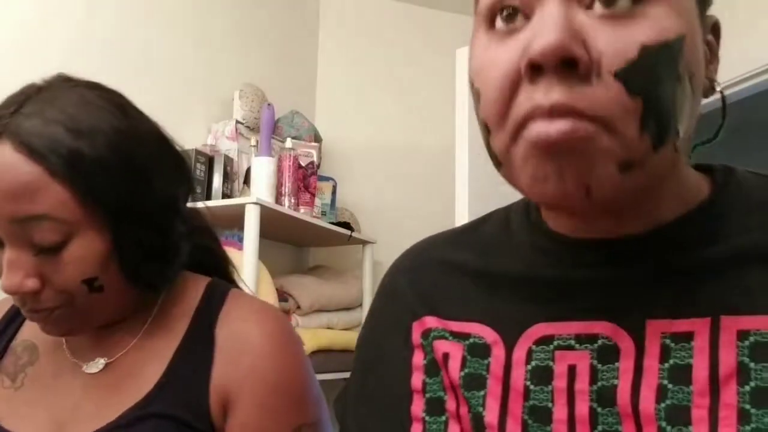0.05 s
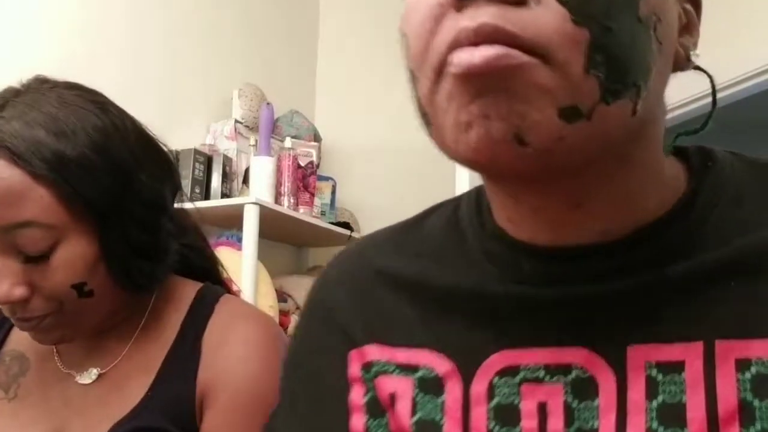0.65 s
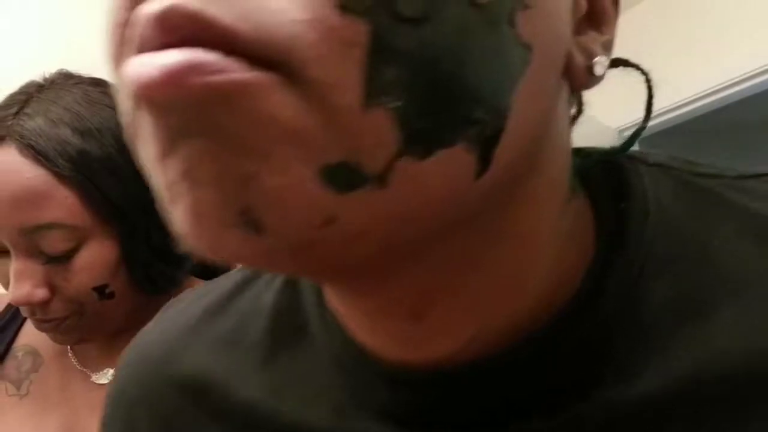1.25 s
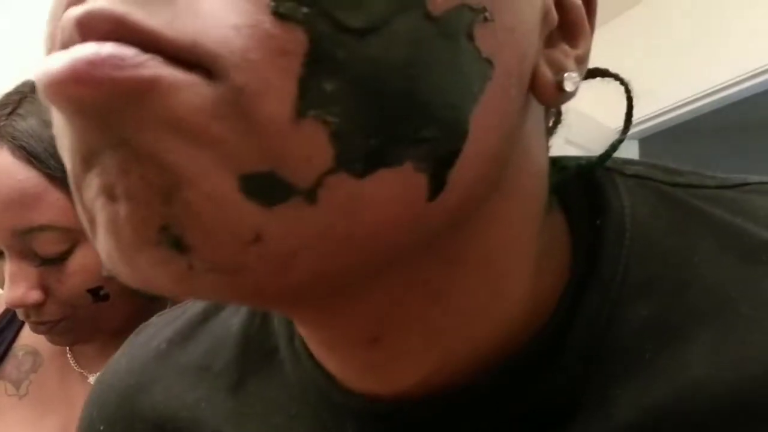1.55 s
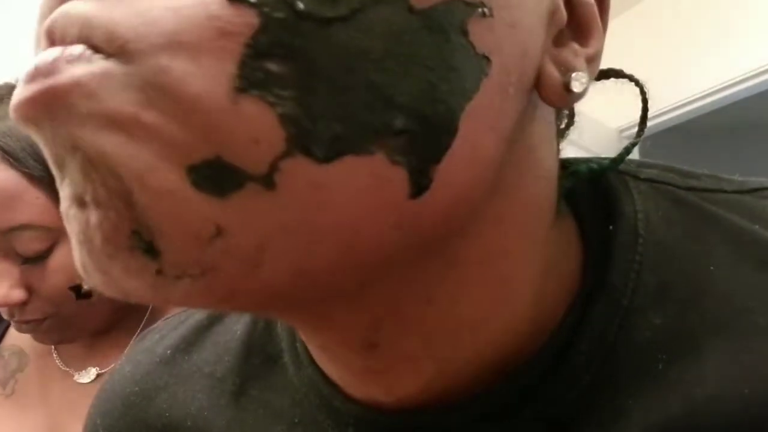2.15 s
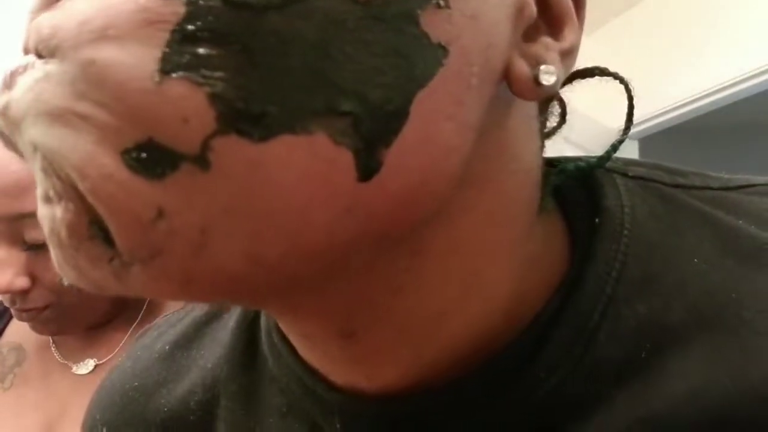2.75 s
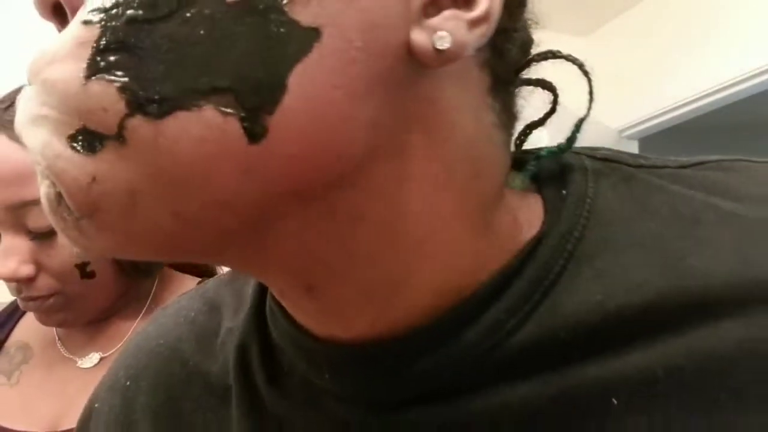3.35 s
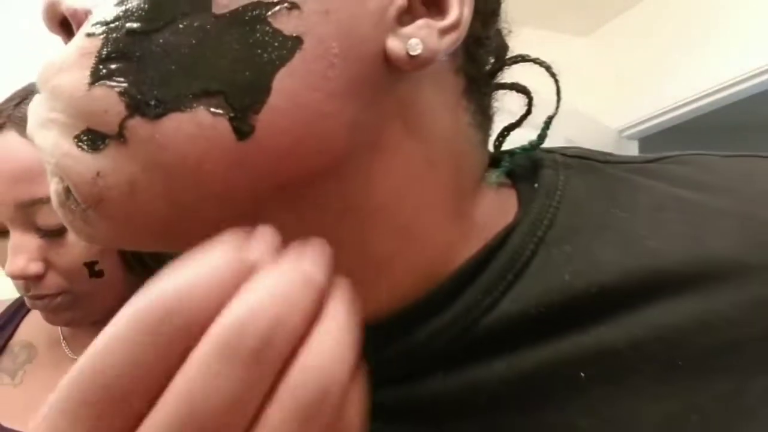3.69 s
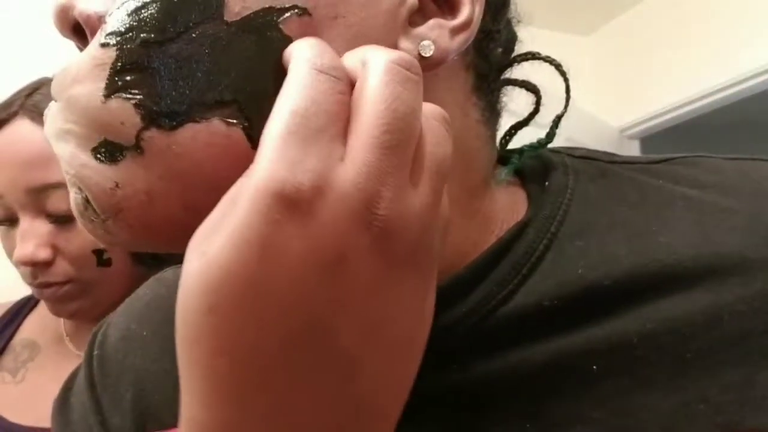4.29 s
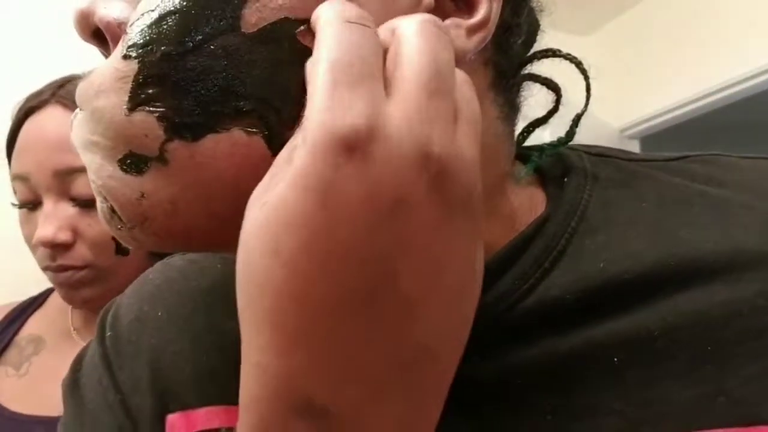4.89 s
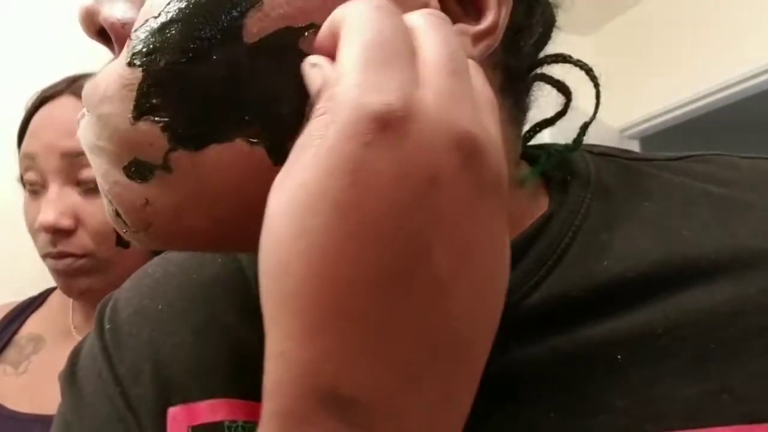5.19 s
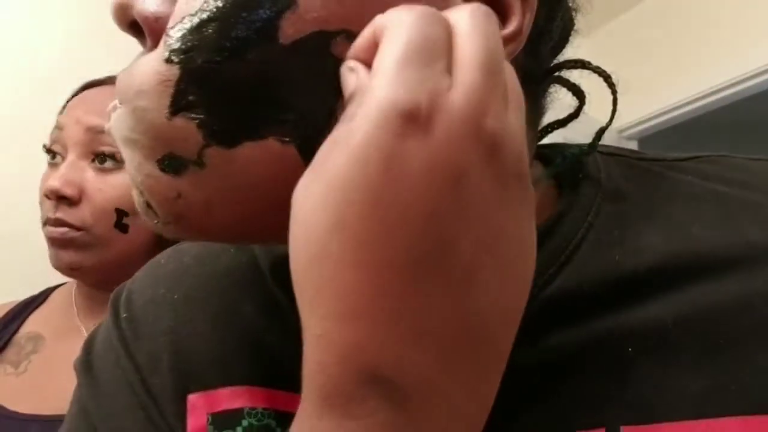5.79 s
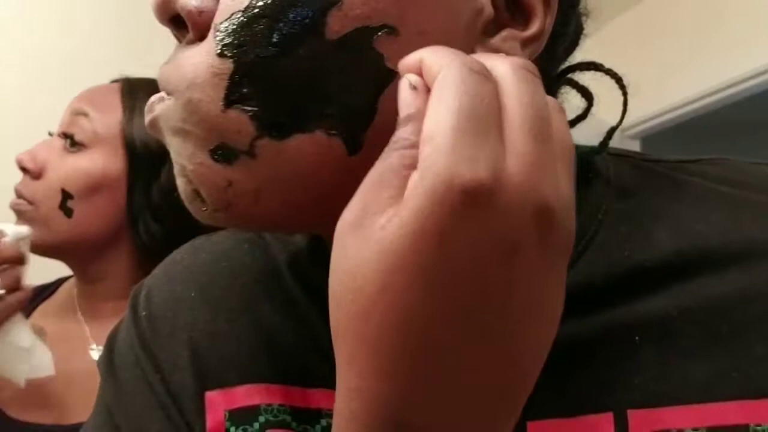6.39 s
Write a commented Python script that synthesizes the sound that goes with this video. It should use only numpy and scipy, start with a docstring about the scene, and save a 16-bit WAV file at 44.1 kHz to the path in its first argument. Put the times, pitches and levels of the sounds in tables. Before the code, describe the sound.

Close, sticky crackles and sharp little snaps come in short pulls as a face mask is peeled from a cheek.

```python
"""Peeling off a dried face mask

Close to a hand-held phone in a small room, the film lets go in sharp snaps: runs of tiny ruptures
that ring the film and jolt the skin. Each pull rubs, crinkles and tears at the glue, and once the
tacky film sticks and slips in a squeak. Two dull bumps and, near the end, a light tap join in.
Behind it all lie a low mains hum and the quiet rush of the room."""
import sys
import numpy as np
from scipy import signal
from scipy.fft import rfft, irfft, next_fast_len
from scipy.io import wavfile
from scipy.ndimage import map_coordinates

SR = 44100
rng = np.random.default_rng(int(sys.argv[2]) if len(sys.argv) > 2 else 0)


def file_out(sig):
    """Save sig as 16-bit WAV at sys.argv[1]."""
    # one column per channel
    cols = np.atleast_2d(sig).T
    # limit, then scale
    lim = np.clip(cols, -1, 1)
    pcm = np.round(lim * 32767).astype(np.int16)
    wavfile.write(sys.argv[1], SR, pcm)


N = 283857
TIME = np.arange(N) / SR

# dull thud of the skin: freq_hz, density_db
SKIN_SPECTRUM = [(30, -21), (90, -9.5), (140, -1), (175, -5.5), (215, 3), (275, -7), (335, 1), (420, -0.5),
                 (540, -3), (660, -8), (705, -2), (750, -5.5), (950, -15), (2000, -61.5)]
# midrange resonances of the dried film: freq_hz, density_db
FILM_SPECTRUM = [(250, -30.5), (700, -14), (880, -6.5), (1080, 1.5), (1230, -6.5), (1420, -2), (1780, -1.5),
                 (2150, -5.5), (2600, -6), (3100, -8), (4200, -16.5), (9000, -41.5)]
# hiss of tearing glue: freq_hz, density_db
GLUE_SPECTRUM = [(1200, -27), (2600, -3), (3800, -1.5), (5600, -2), (7700, 1.5), (9800, -3.5),
                 (14500, -4.5)]


def snaps(usual_db=-41.5, skin_give_s=.006):
    """Each snap is a quick run of tiny ruptures that rings the film and jolts the skin."""
    # breaks of the film, crispness and thud relative to level:
    # start_s, level_db, crispness_db, thud_db, tear_s
    breaks = [(0.4455,-52.5,-2,-15,0.0023), (0.4725,-46.5,-6,-7.5,0.0023), (0.5642,-37.5,-0.5,-15.5,.008),
              (.637,-38,-7.5,-9.5,0.0034), (0.7026,-41.5,8.5,-8.5,.002), (0.7206,-41.5,-7,-3.5,0.0018),
              (0.768,-38.5,-20,-8,0.0034), (0.7732,-37,0.5,-8,.004), (0.8221,-39.5,-2.5,-3.5,0.0022),
              (.867,-42.5,-25,-2,0.0023), (0.9317,-42,-5.5,-5,.0015), (.938,-31.5,-6,-9,0.0057),
              (1.0347,-28.5,-8,-2,0.0033), (1.0518,-35,1,-1.5,0.0049), (1.218,-50,-3,-14,0.0062),
              (1.2251,-36,-10.5,-5,0.0091), (1.2827,-48.5,1,6.5,.0026), (1.29,-36.5,-7,-6,0.0073),
              (1.3376,-46,-6.5,-18,.003), (1.5047,-50,-6,-5.5,0.0042), (1.608,-56,-5,-16,0.03),
              (1.7056,-54,-18,-12,.018), (1.8975,-54,-10,-3.5,.011), (1.9378,-44.5,-15,-14.5,0.0017),
              (2.027,-43,-3.5,-15,0.0061), (2.0733,-48,3.5,-19,.0012), (2.144,-57.5,-13,-13,.001),
              (2.2135,-45.5,-35,-14,0.0017), (2.422,-43.5,-11.5,-11.5,0.0026),
              (2.976,-49,-22.5,-1.5,0.0095), (3.033,-58,-29,-12,0.00085), (3.1028,-38.5,-14.5,-6.5,0.0031),
              (3.2282,-49.5,-17.5,-10.5,0.0034), (3.283,-49,-28,-6.5,0.0021), (3.38,-41.5,-2,-6.5,0.004),
              (3.481,-44,-10.5,-7,.008), (3.632,-43.5,-4,-7.5,0.0046), (3.676,-51.5,-8.5,-2,0.0059),
              (3.7794,-46,-12,-10.5,0.0043), (3.835,-41,-10.5,-7.5,0.0072), (3.943,-34.5,-6.5,-6.5,.003),
              (4.01,-42,-13.5,-6,.002), (4.1068,-47.5,-9,-14.5,0.0056)]
    # bright edge of a break: freq_hz, density_db
    crack_spectrum = [(900, -21), (2400, -0.5), (3700, 3), (5900, -2), (7700, 1.5), (9600, -8),
                      (14500, -10)]
    out = np.zeros((2, N))
    thud = voice(SKIN_SPECTRUM)
    for start_s, level_db, crispness_db, thud_db, tear_s in breaks:
        force_db = level_db - usual_db
        pan_db = -9.5 + .29 * force_db  # strong snaps lie nearer the middle
        # a crisp break reaches higher than a soft one
        bright_db = np.clip(crispness_db + 7, -16, 2)
        tilt_db_per_octave = .75 * max(bright_db, -10)
        crack = voice(coloured(crack_spectrum, lambda hz: tilt_db_per_octave * np.log2(hz / 4000)))
        # the crisper and stronger the break, the higher its flap rings
        flap = flap_spectrum(1900 * 2 ** (.016 * (crispness_db + force_db)), focus_db=7)
        body = voice(coloured(flap, lambda hz: .5 * bright_db * np.clip((hz - 1800) / 700, 0, 1)))
        ruptures = rupture_run(tear_s, first_break=1.41)
        jolt = rupture_run(tear_s + skin_give_s, first_break=.72)  # soft skin spreads the jolt
        wet_path = room_path(near_db=1.5, near_t60_s=.059, room_db=-2.5)
        dry_path = room_path(near_db=-1, near_t60_s=.043, room_db=-3.5)
        # the treble arrives driest; the head shades the far microphone, least in the bass
        layers = ((jolt, thud, wet_path, thud_db, .25),
                  (ruptures, body, wet_path, .3, .8),
                  (ruptures, crack, dry_path, crispness_db + .4, .6))
        for drive, ring, path, layer_db, shade in layers:
            add(out, start_s, amp(level_db + layer_db) * pan(shade * pan_db) * excite(drive, ring, path))
    return out


def rupture_run(length_s, first_break, size=2048):
    """A quick, dying run of tiny ruptures."""
    t = np.arange(size) / SR
    ruptures = rng.standard_normal(size) ** 3 * (rng.random(size) < .12)
    ruptures *= np.exp(-2 * t / length_s)
    ruptures /= np.linalg.norm(ruptures) + 1e-9
    ruptures[0] += first_break * np.exp(-length_s / .016)  # a shorter tear starts harder
    return ruptures[None]


def flap_spectrum(pitch_hz, focus_db):
    """A loose flap favours the film's resonances near its own pitch."""
    return coloured(FILM_SPECTRUM, lambda hz: -focus_db * min(np.log2(hz / pitch_hz) ** 2, 2))


def peeling():
    """Dull rubbing, crinkling of the film and fine tearing of the glue follow each pull."""
    # pulls on the film, rub and tear relative to effort: start_s, length_s, effort_db, rub_db, tear_db
    pulls = [(0.343,.08,-60.5,1.5,-5.5), (.43,0.12,-57.5,-4.5,-0.5), (0.566,.12,-50,-8,-9),
             (0.699,.13,-46.5,-4.5,-9), (0.851,.18,-37.5,-3.5,-13), (1.04,0.17,-54.5,0.5,-6.5),
             (1.2,0.13,-52,-1.5,-13), (1.382,.2,-62.5,-1,-8.5), (1.588,0.14,-57.5,-8,-11),
             (1.878,0.067,-59,-5.5,-6), (1.94,0.096,-53,-14,-3), (2.108,.15,-65.5,0.5,-3),
             (2.268,0.23,-64,1,-12.5), (2.762,0.4,-64,-2.5,-7), (3.102,0.044,-50,-8,-8),
             (3.18,0.183,-61,-0.5,-4), (3.418,.11,-51.5,2,-6), (3.586,.13,-53.5,-1.5,-3),
             (3.769,0.15,-46,-8,-6), (3.978,.15,-61.5,-2.5,-3), (4.203,0.059,-58,1.5,-6.5)]
    efforts = np.zeros((3, N))
    for start_s, length_s, effort_db, rub_db, tear_db in pulls:
        peaks = amp(effort_db) * amp([[rub_db], [0], [tear_db]])
        efforts = np.maximum(efforts, peaks * pull(start_s, length_s))
    rubbing, crinkling, tearing = efforts
    flap = flap_spectrum(1600, focus_db=5)
    rub = crackle(amp(1) * rubbing, SKIN_SPECTRUM, per_s=900, spread_db=2.5, clump_db=.5, pan_db=-3)
    crinkle = crackle(amp(-4) * crinkling, flap, per_s=1100, spread_db=3.5, clump_db=3, pan_db=-6)
    tear = crackle(amp(-1) * tearing, GLUE_SPECTRUM, per_s=3000, spread_db=1.5, clump_db=3, pan_db=-5.5)
    return rub + crinkle + tear


def pull(start_s, length_s, grip_s=.027, swell_db=4.5, release_db_per_s=220.5):
    """Envelope of one pull: it takes hold, builds steadily, then lets go."""
    t = TIME - start_s
    grip = np.clip(t / grip_s, 0, 1)
    return grip * amp(np.minimum(swell_db * (t / length_s - 1), release_db_per_s * (length_s - t)))


def crackle(effort, spectrum, per_s, spread_db, clump_db, pan_db, spots=3):
    """Small bonds break at random, in clumps, at a few spots on the cheek."""
    out = np.zeros((2, N))
    strength = effort * amp(clump_db * wobble(45))
    for _ in range(spots):
        sizes = amp(spread_db * np.minimum(rng.standard_exponential(N), 4))
        signs = rng.choice([-1, 1], N)
        grains = unit(sizes * signs * (rng.random(N) < per_s / spots / SR))
        ring = signal.fftconvolve(room_path(), voice(spectrum), axes=1)
        ring /= np.linalg.norm(ring, axis=1, keepdims=True)
        out += signal.fftconvolve((strength * grains)[None], ring, axes=1)[:, :N]
    return out * pan(pan_db) / np.sqrt(spots)


def squeak():
    """Two overlapping chirps of tacky film."""
    # glide of the main chirp: time_s, pitch_hz, level_db
    main_glide = [(2.69, 950, -73), (2.702, 940, -49.5), (2.713, 1100, -53), (2.723, 1052, -52),
                  (2.731, 1066, -65), (2.741, 1115, -69), (2.756, 1060, -82)]
    # its harmonics: multiple, level_db
    harmonics = [(1, -23), (2, 2.5), (3, -7), (4, -16), (5, -17), (6, -14), (7, -11), (8, -22)]
    # the short slip that ends the squeak: time_s, pitch_hz, level_db
    slip_glide = [(2.718, 1136, -75), (2.729, 1190, -55.5), (2.739, 1290, -61), (2.747, 1490, -58.5),
                  (2.757, 1480, -80)]
    chirps = chirp(main_glide, harmonics, jitter=.028, rasp_db=-11)
    chirps += chirp(slip_glide, [(1, 0)], jitter=.0255, rasp_db=-1)
    path = room_path(room_db=-4)
    heard = signal.fftconvolve(chirps[None], path / np.linalg.norm(path[0]), axes=1)
    return heard[:, :N] * pan(-6)


def chirp(glide, harmonics, jitter, rasp_db):
    """The tacky surface sticks and slips at a gliding rate, each slip with a puff of hiss."""
    times_s, *columns = np.transpose(glide)
    pitch_hz, level_db = [np.interp(TIME, times_s, column) for column in columns]
    phase = 2 * np.pi * np.cumsum(pitch_hz * (1 + jitter * wobble(700))) / SR
    slips = sum(amp(db) * np.sin(multiple * phase) for multiple, db in harmonics)
    puffs = rng.standard_normal(N) * (1 + np.cos(phase))
    rasp = filtered(puffs, lambda hz: amp(along(GLUE_SPECTRUM, hz)))
    sounding = (TIME > times_s[0]) & (TIME < times_s[-1])
    return (unit(slips) + amp(rasp_db) * unit(rasp)) * amp(level_db) * sounding


def bumps():
    """A sudden shift of skin or cloth gives a dull thud."""
    # shifts of skin and cloth: start_s, level_db, length_s
    shifts = [(3.49,-41.5,.016), (4.28,-50.5,.017)]
    out = np.zeros((2, N))
    for start_s, level_db, length_s in shifts:
        path = room_path(near_db=1.5, near_t60_s=.06, room_db=-2)
        thud = excite(rupture_run(length_s, first_break=1.6), voice(SKIN_SPECTRUM), path)
        add(out, start_s, amp(level_db) * pan(-2) * thud)
    return out


def tap(start_s=5.1535, level_db=-51.5, rattle_t60_s=.1, size=2048):
    """A light, slightly rattling tap farther off, heard mostly through its reflections."""
    # resonances of the tap: freq_hz, density_db
    tap_spectrum = [(80, -19), (200, -1.5), (330, -0.5), (560, -6), (760, 4), (1050, -11), (1450, 1),
                    (1900, -1), (2450, -0.5), (3200, -15.5), (5500, -17.5), (8000, -29), (14000, -44)]
    contact = rng.standard_normal(size) * amp(-60 * np.arange(size) / SR / rattle_t60_s)
    contact[0] += 7  # the first touch
    knock = signal.fftconvolve(voice(tap_spectrum), contact[None])
    heard = signal.fftconvolve(room_path(near_t60_s=.07, room_db=-1), knock, axes=1)
    attack_rms = np.std(heard[:, :1100])
    out = np.zeros((2, N))
    add(out, start_s, amp(level_db) * pan(-6.5) * heard / attack_rms)
    return out


def room_tone(air_db=-63.5, drift_rad=.62):
    """Soft steady air noise and the slightly unsteady hum of an appliance."""
    # rush of the quiet room: freq_hz, density_db
    air_spectrum = [(12, -43), (20, -15.5), (43, -7), (75, -4.5), (123, -4), (145, -12.5), (232, -16.5),
                    (342, -17), (489, -13.5), (719, -27), (947, -28), (1790, -36.5), (2110, -35.5),
                    (3270, -39.5), (14500, -39.5)]
    # tones of the hum: pitch_hz, level_db
    hum_tones = [(91.5, -84), (119, -71), (495, -80.5)]
    air = unit(filtered(diffuse_noise(N), lambda hz: amp(along(air_spectrum, hz))))
    hum = sum(amp(db) * np.sqrt(2) * np.sin(2 * np.pi * hz * TIME + drift_rad * wobble(5))
              for hz, db in hum_tones)
    return (amp(air_db) * air + hum) * pan(-1.2)


def room_path(near_db=0, near_t60_s=.093, room_db=0, lag_samples=13, size=SR // 3):
    """Stereo impulse response: direct sound, scatter off face and hand, then the room's tail."""
    # ring of the small room: freq_hz, t60_s
    decay_times = [(150, 0.21), (400, 0.35), (1040, 0.28), (2760, 0.23), (7280, 0.22), (14000, .2)]
    t = np.arange(size) / SR
    hz, frames_s, bands = signal.stft(diffuse_noise(size), SR, nperseg=256)
    bands *= amp(-60 * frames_s / along(decay_times, hz)[:, None])
    tail = signal.istft(bands, SR, nperseg=256)[1][:, :size]
    tail *= 1 - np.exp(-t / .0055)  # reflections take a moment to build
    scatter = diffuse_noise(size) * amp(-60 * t / near_t60_s)
    response = amp(near_db) * scatter / np.linalg.norm(scatter[0])
    response += amp(room_db) * tail / np.linalg.norm(tail[0])
    response[1, 0] += 1  # the direct sound reaches the right side first
    response[0, lag_samples] += 1
    return response


def diffuse_noise(n):
    """Noise from all sides: alike at both microphones only in the bass."""
    # likeness of left and right: freq_hz, coherence
    likeness = [(120, 0.91), (250, 0.84), (500, 0.39), (1000, 0.18), (4000, 0.07)]

    def mid_side_gains(hz):
        angle = np.arccos(along(likeness, hz)) / 2
        return np.array([np.cos(angle), np.sin(angle)])

    mid, side = filtered(rng.standard_normal((2, n)), mid_side_gains)
    return np.array([mid + side, mid - side])


def voice(spectrum, size=2048):
    """The minimum-phase ring of a body with this spectrum."""
    cepstrum = irfft(np.log(amp(along(spectrum, np.fft.rfftfreq(size, 1 / SR)))))
    cepstrum[1:size // 2] *= 2
    cepstrum[size // 2 + 1:] = 0
    return irfft(np.exp(rfft(cepstrum)))[None, :size // 2]


def excite(ruptures, ring, path, attack_samples=530):
    """Ruptures through a body and its path to the microphones, with an attack of rms 1."""
    sound = signal.fftconvolve(path, signal.fftconvolve(ring, ruptures), axes=1)
    return sound / np.std(sound[:, :attack_samples], axis=1, keepdims=True)


def coloured(spectrum, extra_db):
    """The spectrum with an EQ curve added."""
    return [(hz, db + extra_db(hz)) for hz, db in spectrum]


def filtered(x, response):
    """Filter x with a gain given as a function of frequency."""
    n = x.shape[-1]
    padded = next_fast_len(n + 4096)
    return irfft(rfft(x, padded) * response(np.fft.rfftfreq(padded, 1 / SR)), padded)[..., :n]


def along(points, hz):
    """Interpolate (freq_hz, value) points on a log frequency axis."""
    freqs_hz, values = np.transpose(points)
    return np.interp(np.log(hz + 1), np.log(freqs_hz + 1), values)


def wobble(knots_per_s):
    """A smooth random curve."""
    return map_coordinates(rng.standard_normal(int(N * knots_per_s / SR) + 4), [TIME * knots_per_s])


def pan(pan_db):
    """Left and right gains of constant power; negative leans right."""
    return unit(amp([[pan_db / 2], [-pan_db / 2]]))


def add(track, start_s, sound):
    """Mix a sound into the track."""
    part = track[:, round(start_s * SR):][:, :sound.shape[1]]
    part += sound[:, :part.shape[1]]


def amp(db):
    """Decibels to gain."""
    return 10 ** (np.asarray(db) / 20)


def unit(x):
    """Scale to rms 1."""
    return x / np.sqrt(np.mean(x ** 2) + 1e-20)


def scene():
    """The mask up close and to the right, over the tap and the room."""
    return snaps() + bumps() + peeling() + squeak() + tap() + room_tone()


def record(dry, top_hz=14750):
    """The phone cuts off steeply above its band limit."""
    return filtered(dry, lambda hz: 1 / np.sqrt(1 + (hz / top_hz) ** 200))


dry = scene()
out = record(dry)
file_out(out)
```